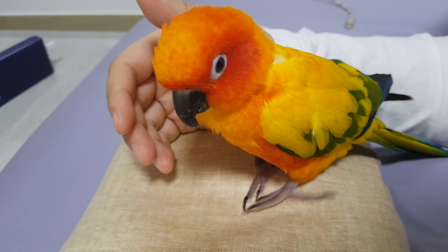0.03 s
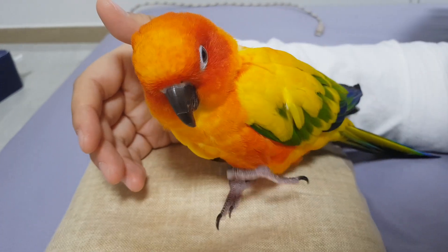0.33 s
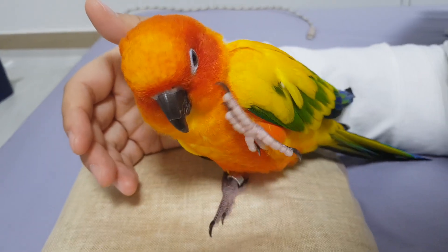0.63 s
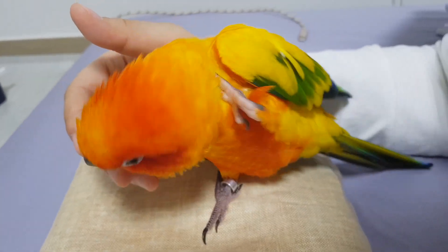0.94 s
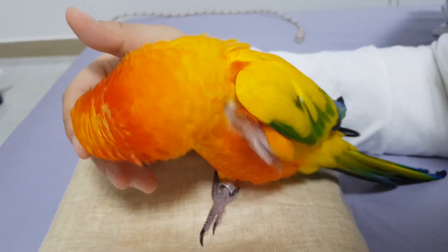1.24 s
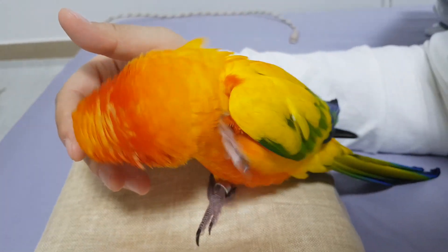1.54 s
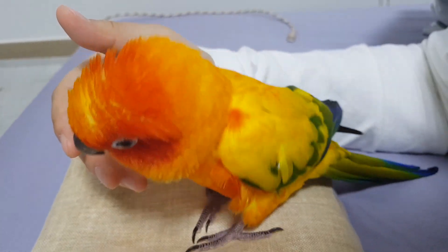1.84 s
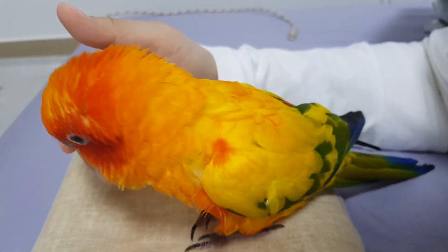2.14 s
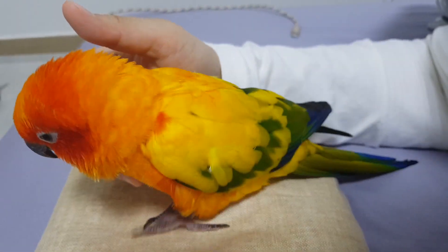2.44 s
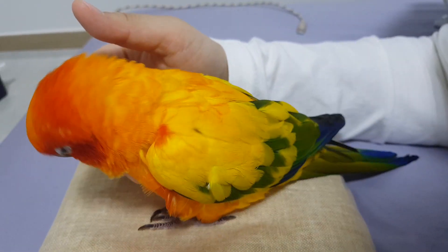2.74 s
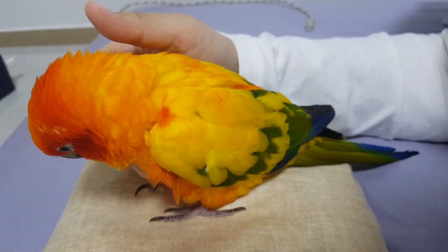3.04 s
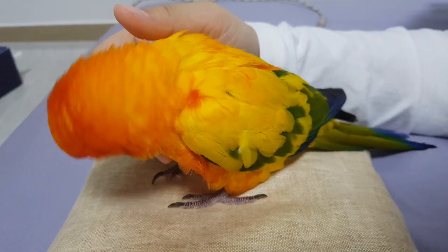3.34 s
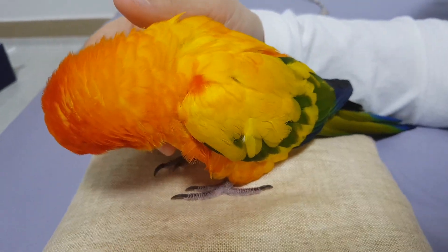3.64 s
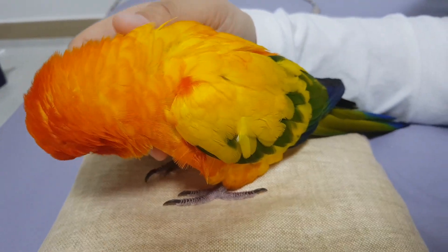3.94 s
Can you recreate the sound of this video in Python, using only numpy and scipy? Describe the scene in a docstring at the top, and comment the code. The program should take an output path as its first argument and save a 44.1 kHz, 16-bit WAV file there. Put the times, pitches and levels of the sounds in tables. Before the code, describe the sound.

Soft, rapid feather scratching from a small parrot is heard up close over a steady indoor hum. Light ticks, foot pats on cloth and brief feather brushes follow, before low bumps and rumble from fingers gripping the microphone.

```python
"""A quiet room: a small parrot on a lap scratches its head with a foot, about thirty strokes a second.
The claw rakes crackling feather barbs, and the cupped hand around the head adds a hollow ring.
The bird sets the foot down and settles with ticks and soft pats, its feathers brushing hand and cloth.
An appliance hums throughout; near the end the grip on the camera rumbles in the right microphone."""
import sys
import numpy as np
from scipy import signal
from scipy.fft import rfft, irfft
from scipy.io import wavfile

SR = 44100
rng = np.random.default_rng(int(sys.argv[2]) if len(sys.argv) > 2 else 0)


def file_out(sig):
    """Save sig as 16-bit WAV at sys.argv[1]."""
    # one column per channel
    cols = np.atleast_2d(sig).T
    # limit, then scale
    lim = np.clip(cols, -1, 1)
    pcm = np.round(lim * 32767).astype(np.int16)
    wavfile.write(sys.argv[1], SR, pcm)


N = 176400
T = np.arange(N) / SR
BIN_HZ = np.fft.rfftfreq(N, 1 / SR) + 1


def amp(db):
    """Decibels to gain."""
    return 10 ** (np.asarray(db) / 20)


def unit_rms(x):
    """Scales to rms 1."""
    return x / np.sqrt(np.mean(abs(x) ** 2) + 1e-30)


def pan(left_db):
    """Stereo gains, left over right by left_db."""
    return amp(np.array([[left_db], [-left_db]]) / 2)


def per_bin(table):
    """Frequency table interpolated at every bin."""
    hz, value = np.transpose(table)
    return np.interp(np.log(BIN_HZ), np.log(hz), value)


def band(centre_hz, width_oct):
    """Steep-sided resonance, dB per bin."""
    return -20 * np.log10(1 + (np.log2(BIN_HZ / centre_hz) / width_oct) ** 4 / 2)


def envelope(table):
    """Level table as gain per sample."""
    time_s, level_db = np.transpose(table)
    return amp(np.interp(T, time_s, level_db, left=-120, right=-120))


def strike(time_s, rise_s, fall_s):
    """Gaussian rise around time_s, then exponential fall."""
    from_peak_s = T - time_s - rise_s / 2
    return np.exp(-(np.minimum(from_peak_s, 0) / rise_s) ** 2 - np.maximum(from_peak_s, 0) / fall_s)


def swell(peak_s, half_s):
    """Smooth symmetric rise and fall."""
    return 1 / np.cosh(np.clip((T - peak_s) / half_s, -20, 20))


# Left-right likeness: freq_hz, correlation
MIC_CORRELATION = [(50,1),(300,0.64),(640,0.4),(1400,0),(3000,0),(15000,0)]

def colour(pair, spectrum_db):
    """Filters two signals to joint rms 1; both microphones share the bass."""
    left, independent = rfft(pair)
    shared = per_bin(MIC_CORRELATION)
    right = shared * left + np.sqrt(1 - shared ** 2) * independent
    return unit_rms(irfft(np.array([left, right]) * amp(spectrum_db), N))


def noise(spectrum_db):
    """Smooth stereo noise."""
    return colour(rng.standard_normal((2, N)), spectrum_db)


def crackle(spectrum_db, snaps_per_s, spread_db):
    """Tiny uneven snaps of barbs and fibres."""
    snaps = rng.random(N) < snaps_per_s / SR
    size = amp(spread_db * np.minimum(rng.exponential(1, N), 4))
    return colour(snaps * size * rng.standard_normal((2, N)), spectrum_db)


def resonate(x, centre_hz, width_hz):
    """Resonance with a moving centre."""
    carrier = np.exp(2j * np.pi * np.cumsum(centre_hz) / SR)
    pole = np.exp(-np.pi * width_hz / SR)
    return 2 * (carrier * signal.lfilter([1 - pole], [1, -pole], x / carrier)).real


def wavering_tone(pitch_hz, waver_ratio, corner_hz=10.8):
    """Sine with slow random unrest in level and phase."""
    white = rfft(rng.standard_normal((2, N)))
    level_drift, phase_drift = unit_rms(irfft(white / (1 + (BIN_HZ / corner_hz) ** 2), N))
    phase = 2 * np.pi * (pitch_hz * T + rng.random())
    tone = (1 + waver_ratio * level_drift) * np.sin(phase)
    return unit_rms(tone + waver_ratio * phase_drift * np.cos(phase))


# Claw strokes: time_s, relative_db, fall_ratio
CLAW_STROKES = [(0.943, -52, 0.98), (0.9742, -56, 1), (1.0104, -64, 0.9), (1.0354, -60, 0.9),
                (1.053, -50, 0.9), (1.0804, -54, 0.62), (1.1084, -48, 0.99), (1.1404, -48, 0.9),
                (1.1644, -53, 0.9), (1.1793, -48, 0.9), (1.1896, -46.5, 0.81), (1.2084, -49.5, 0.9),
                (1.234, -51, 0.9), (1.2467, -43.5, 0.99), (1.277, -44.5, 0.9), (1.3094, -48.5, 0.64),
                (1.3384, -43.5, 0.52), (1.377, -48, 0.9), (1.4094, -50.5, 0.97), (1.4386, -45, 0.9),
                (1.4574, -49, 0.82), (1.496, -50.5, 0.99), (1.515, -48.5, 0.9), (1.5234, -55, 0.9),
                (1.6004, -53.5, 0.78)]
# Head feathers under the foot: time_s, relative_db
RUFFLE_LEVEL = [(0.7, -78), (0.878, -64.5), (1.256, -62.5), (1.512, -67.5), (1.64, -69.5), (1.686, -69),
                (1.772, -76), (1.8, -74), (1.85, -77)]
# Raked barbs and ruffled plumage: freq_hz, density_db
CLAW_SPECTRUM = [(710, -41), (1200, -17), (2030, -5), (4200, -5.5), (4830, -0.5), (5490, -5), (7170, 0),
                 (9890, -9), (13100, 2), (15500, -5)]
PLUMAGE_SPECTRUM = [(710, -41), (1200, -13), (1840, 5), (2070, -6.5), (2430, -1), (3050, -0.5), (3500, -4),
                    (4880, 3), (5430, 0), (7330, 5), (9780, -3.5), (12900, 3), (15500, -3.5)]
# Scratch balance: freq_hz, relative_left_db
SCRATCH_BALANCE = [(1200,1),(2000,-0.5),(2900,-6),(3700,2),(4800,2.5),(6000,2),(7400,2.5),(9800,10.5),(13000,1),(15500,2)]

def scratching():
    """Each claw stroke rakes a burst of barbs, over the ruffle of the plumage."""
    balance_db = np.array([[1], [-1]]) * per_bin(SCRATCH_BALANCE) / 2
    strokes = sum(amp(relative_db) * strike(time_s, rise_s=0.0031, fall_s=0.0069 * fall_ratio)
                  for time_s, relative_db, fall_ratio in CLAW_STROKES)
    barbs = crackle(per_bin(CLAW_SPECTRUM) + balance_db, snaps_per_s=11000, spread_db=2.5)
    plumage = crackle(per_bin(PLUMAGE_SPECTRUM) + balance_db, snaps_per_s=9000, spread_db=2.5)
    rake = amp(-8.5) * strokes * barbs * pan(2.2)
    ruffle = amp(-1) * envelope(RUFFLE_LEVEL) * plumage * pan(-1.3)
    return rake + ruffle


# Hollow ring: time_s, level_db, centre_hz
HAND_RING = [(.78,-84,2100),(.82,-75.5,2200),(.9,-73.5,2780),(1.05,-80,3100),(1.25,-76,2800),(1.5,-73,2680),(1.66,-74,2830),(1.75,-79.5,3100),(1.85,-80,3150)]

def cupped_hand(width_hz=1600):
    """The hollow of the hand rings as the head rubs inside it."""
    time_s, level_db, centre_hz = np.transpose(HAND_RING)
    glide_hz = np.interp(T, time_s, centre_hz)
    ring = crackle(per_bin(PLUMAGE_SPECTRUM), snaps_per_s=3600, spread_db=-0.5)
    for _ in range(2):
        ring = resonate(ring, glide_hz, width_hz)
    return envelope(np.c_[time_s, level_db]) * unit_rms(ring) * pan(-7)


# Feather brushes: peak_s, half_s, level_db, tilt_db_per_oct, left_db
FEATHER_BRUSHES = [(0.094,0.045,-72,0,1),(1.53,0.049,-71.5,-2.5,-5),(1.69,0.013,-63.5,2,-6),(1.88,.035,-67,-7,0),(2.287,0.025,-68.5,-6,4),(2.384,.07,-77,2,-2),(2.88,.028,-62.5,0,0.5),(3.398,0.04,-66.5,-1,-3),(3.597,0.072,-74,-2.5,-5.5)]
# Sliding feathers: freq_hz, density_db
BRUSH_SPECTRUM = [(500,-30),(1500,4),(3000,-2.5),(5000,-1),(7000,4),(9500,-6.5),(13000,-2),(15500,-4.5)]

def brushing():
    """Feathers slide past hand and cloth in short crackling swells."""
    out = np.zeros((2, N))
    for peak_s, half_s, level_db, tilt_db_per_oct, left_db in FEATHER_BRUSHES:
        spectrum_db = per_bin(BRUSH_SPECTRUM) + tilt_db_per_oct * np.log2(BIN_HZ / 5000)
        barbs = crackle(spectrum_db, snaps_per_s=11000, spread_db=3.5)
        out += amp(level_db) * swell(peak_s, half_s) * barbs * pan(left_db)
    return out


# Claw and beak ticks: time_s, level_db, centre_hz, width_oct, left_db
HORN_TICKS = [(.215,-66.5,6840,0.27,11),(0.808,-58,1970,0.42,4),(.931,-56,2500,0.98,1),(0.975,-58,4000,0.88,-1),(1.807,-56.5,2200,1.3,-3),(1.845,-53.5,870,0.47,3),(2.264,-64,1290,0.8,7),(2.487,-64,1300,0.67,4),(3.545,-65,5830,0.29,-9)]

def ticks():
    """Hard horn of claw and beak makes dry, band-limited clicks."""
    out = np.zeros((2, N))
    for time_s, level_db, centre_hz, width_oct, left_db in HORN_TICKS:
        click = strike(time_s, rise_s=0.002, fall_s=0.002) * noise(band(centre_hz, width_oct))
        out += amp(level_db) * click * pan(left_db)
    return out


# Steps on the lap: time_s, level_db
LAP_STEPS = [(.175,-53.5),(1.797,-48.5),(1.803,-50),(1.844,-49.5),(1.862,-59),(2.404,-52),(2.487,-50),(2.834,-48.5)]
# Dull pat: freq_hz, density_db
STEP_SPECTRUM = [(60,7),(150,-9),(300,3),(600,-8),(1000,-11.5),(2000,-25.5),(5000,-33)]

def steps():
    """Feet pat softly on cloth."""
    pats = sum(amp(level_db) * strike(time_s, rise_s=0.0011, fall_s=0.0091)
               for time_s, level_db in LAP_STEPS)
    return pats * noise(per_bin(STEP_SPECTRUM)) * pan(2.5)


# Cloth movement: time_s, level_db
CLOTH_LEVEL = [(.1,-83),(.4,-67.5),(.55,-64),(1,-63),(1.45,-59.5),(1.72,-65),(1.85,-60),(2.05,-66),(2.3,-60),(2.7,-64.5),(3.0,-61.5),(3.3,-67.5),(3.6,-66),(4,-60.5)]
# Cloth fibres: freq_hz, density_db
CLOTH_SPECTRUM = [(40,-4),(100,-3),(180,-6),(280,0.5),(500,-9),(750,-14.5),(1100,-17.5),(1600,-24.5),(2500,-31),(6000,-43)]

def cloth():
    """Fibres shift under the bird with a low crackle."""
    fibres = crackle(per_bin(CLOTH_SPECTRUM), snaps_per_s=700, spread_db=0)
    return envelope(CLOTH_LEVEL) * fibres * pan(2.8)


# Skin squeaks: peak_s, half_s, level_db
SKIN_RUBS = [(3.184,0.025,-75),(3.51,0.023,-67),(3.567,0.014,-70.5),(3.656,0.036,-76)]

def skin_squeaks():
    """Skin rubs on cloth in a narrow band of noise."""
    rubs = sum(amp(level_db) * swell(peak_s, half_s) for peak_s, half_s, level_db in SKIN_RUBS)
    return rubs * noise(band(centre_hz=1355, width_oct=0.2)) * pan(-4)


# Finger slips: peak_s, level_db
FINGER_SLIPS = [(3.328,-40),(3.437,-38),(3.625,-32),(3.665,-32.5),(3.686,-30.5),(3.77,-31.5),(3.843,-39),(3.871,-33),(3.912,-28)]
# Grip rumble: time_s, level_db
GRIP_LEVEL = [(3.05,-78),(3.25,-50.5),(3.35,-44.5),(3.52,-48),(3.6,-43.5),(3.67,-40),(3.73,-40),(3.8,-39),(3.9,-44),(4,-41)]
# Grip rumble: freq_hz, density_db
GRIP_SPECTRUM = [(20,-18),(45,0.5),(70,4),(95,4.5),(130,-9),(190,-9),(280,-15),(450,-32),(1000,-58.5)]

def camera_grip(thud_hz=101):
    """The hand rumbles on the camera and slipping fingers thud, mostly on the right."""
    thuds = sum(amp(level_db) * swell(peak_s, half_s=0.0037) * np.sin(2 * np.pi * thud_hz * (T - peak_s))
                for peak_s, level_db in FINGER_SLIPS)
    rumble = envelope(GRIP_LEVEL) * noise(per_bin(GRIP_SPECTRUM))[0]
    return (thuds + rumble) * amp([[-20], [0]])


# Main hum tone: time_s, level_db
MAIN_TONE_LEVEL = [(0,-55),(.38,-54.5),(.56,-52),(.72,-51),(.81,-54.5),(.9,-52),(1.1,-50.5),(1.17,-53),(1.42,-48.5),(1.55,-52.5),(1.9,-52.5),(2.1,-53.5),(2.55,-52),(2.7,-49.5),(2.93,-54),(3.08,-50.5),(3.6,-52),(4,-50)]
# Other hum lines: pitch_hz, level_db, waver_ratio, left_db
HUM_LINES = [(50.8,-49.5,0.02,2.5),(90.2,-62,0.14,-2.5),(153.3,-74.5,0.83,0),(306.9,-68,0.28,9),(427,-81,0.41,3.5),(521.5,-78,.6,9.5),(901,-86.5,0.97,5),(975,-84.5,.6,16.5),(1008,-82,1,8.5),(1346,-88.5,0.93,-9)]

def appliance():
    """A hum of wavering lines; the main tone drifts in level."""
    main_tone = envelope(MAIN_TONE_LEVEL) * wavering_tone(pitch_hz=332.7, waver_ratio=0.16) * pan(-0.83)
    return main_tone + sum(amp(level_db) * wavering_tone(pitch_hz, waver_ratio) * pan(left_db)
                           for pitch_hz, level_db, waver_ratio, left_db in HUM_LINES)


# Passing tones: peak_s, half_s, level_db, pitch_hz
LOW_TONES = [(0.574,0.18,-63,149.8),(1.63,0.078,-62,148),(2.694,0.069,-61,195.8)]

def low_tones():
    """Faint low tones come and go under the hum."""
    return sum(amp(level_db) * swell(peak_s, half_s) * wavering_tone(pitch_hz, waver_ratio=0.35)
               for peak_s, half_s, level_db, pitch_hz in LOW_TONES)


# Room air and broad hiss: freq_hz, density_db
AIR_SPECTRUM = [(20,-12.5),(32,-6.5),(45,5.5),(65,-1),(90,0),(130,-6),(200,-10.5),(320,-6.5),(480,-14),(720,-22),(980,-17.5),(1200,-28.5),(1500,-25.5),(2200,-34.5),(4000,-40),(15000,-47)]
HISS_SPECTRUM = [(1500,-12.5),(2200,0.5),(3100,-0.5),(4500,0.5),(5900,-3),(7400,1.5),(8500,-6),(10000,-5),(12500,-1.4),(15500,-1.8)]
# Narrow hiss: time_s, level_db
NARROW_HISS_LEVEL = [(0,-74),(.7,-78),(1.3,-77),(1.9,-75.5),(2.4,-73.5),(2.52,-84),(2.72,-95),(2.82,-74),(3.2,-76),(3.6,-77),(4,-83)]

def room_noise():
    """Low air noise, broad hiss and a narrow hiss on the right."""
    air = amp(-60) * noise(per_bin(AIR_SPECTRUM)) * pan(0.17)
    hiss = amp(-73) * noise(per_bin(HISS_SPECTRUM))
    narrow_hiss = envelope(NARROW_HISS_LEVEL) * noise(band(centre_hz=7276, width_oct=0.079))
    return air + hiss + narrow_hiss * amp([[-14], [0]])


def reverb(x, wet_db, t60_s, predelay_s=0.003):
    """Adds the short tail of a small room."""
    t = np.arange(SR // 3) / SR
    tail = rng.standard_normal((2, len(t))) * amp(-60 * t / t60_s) * (t > predelay_s)
    tail /= np.linalg.norm(tail[0])
    return x + amp(wet_db) * signal.fftconvolve(x, tail, axes=1)[:, :N]


def scene():
    """The bird close by, in the humming room."""
    lap = scratching() + cupped_hand() + brushing() + ticks() + steps() + cloth() + skin_squeaks()
    return reverb(lap, wet_db=-8, t60_s=0.18) + camera_grip() + appliance() + low_tones() + room_noise()


def record(dry, open_s=0.062, fade_in_s=0.0099, fade_out_s=0.004, cutoff_hz=15780):
    """Brief silence, short fades at both ends, low-pass."""
    fade_in = np.clip((T - open_s) / fade_in_s, 0, 1)
    fade_out = np.clip((T[-1] - T) / fade_out_s, 0, 1)
    lowpass = signal.firwin(511, cutoff_hz, window=("kaiser", 9), fs=SR)
    return signal.oaconvolve(dry * fade_in * fade_out, lowpass[None], "same")


dry = scene()
out = record(dry)
file_out(out)
```